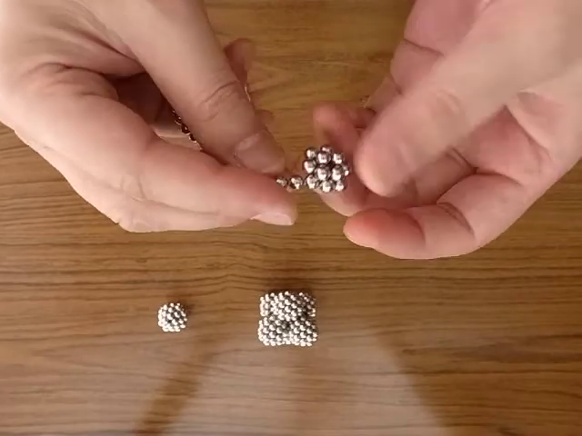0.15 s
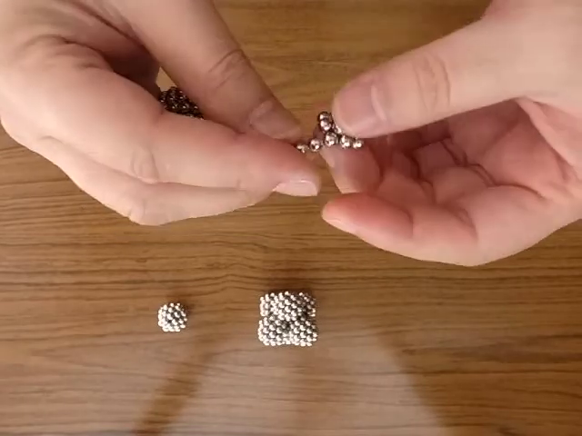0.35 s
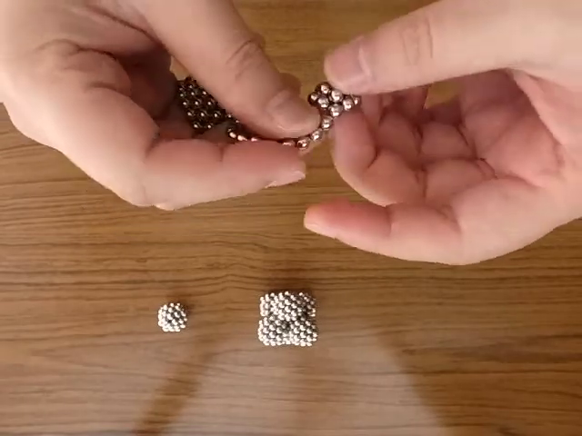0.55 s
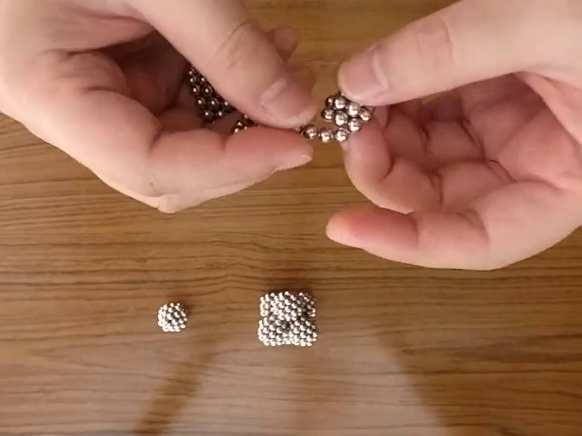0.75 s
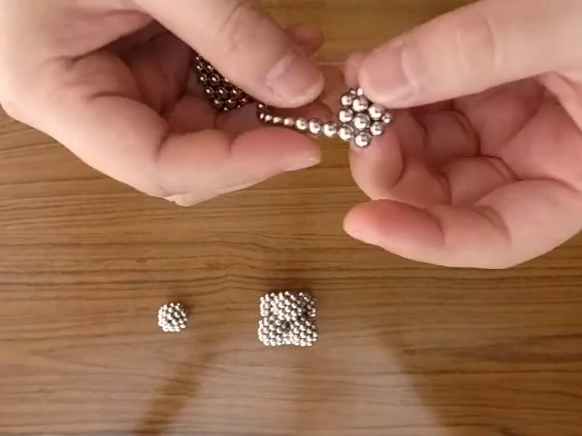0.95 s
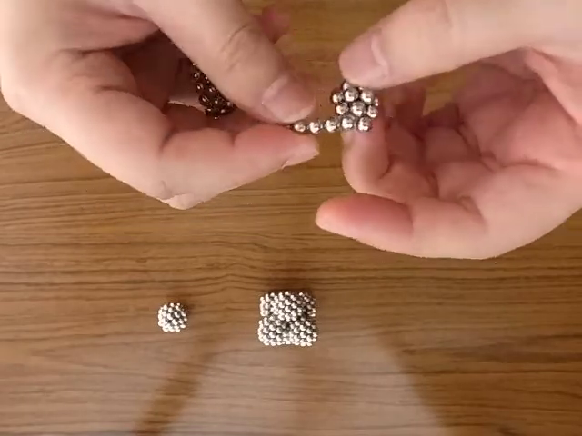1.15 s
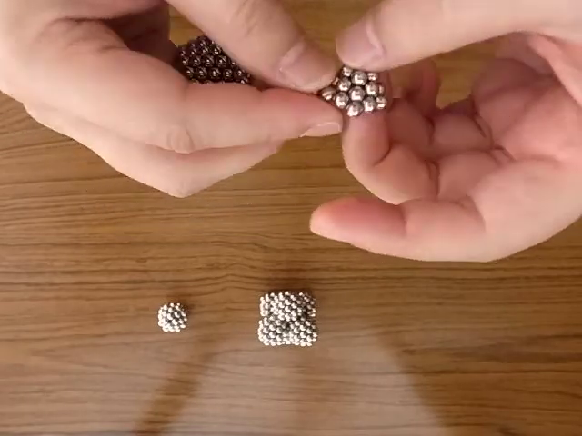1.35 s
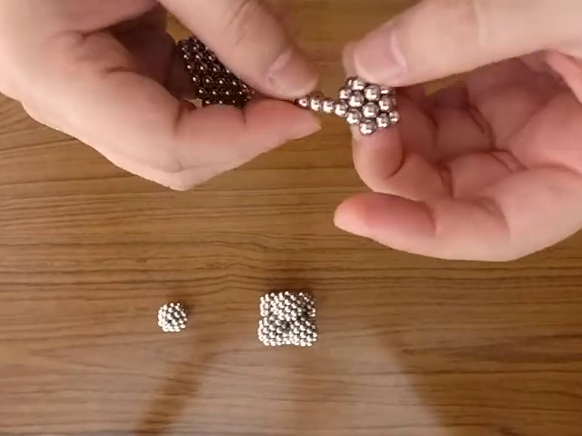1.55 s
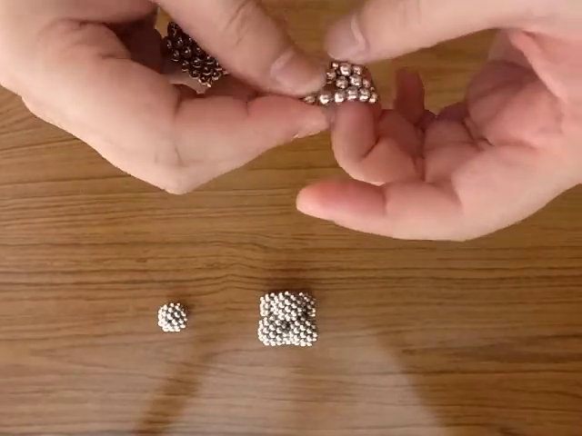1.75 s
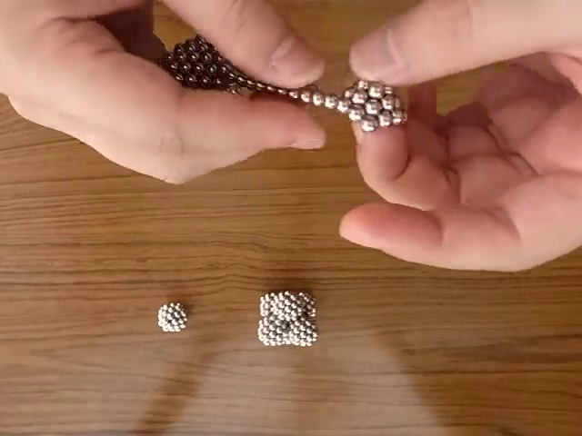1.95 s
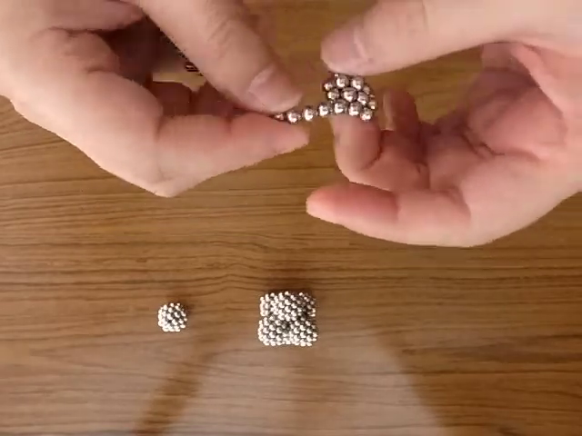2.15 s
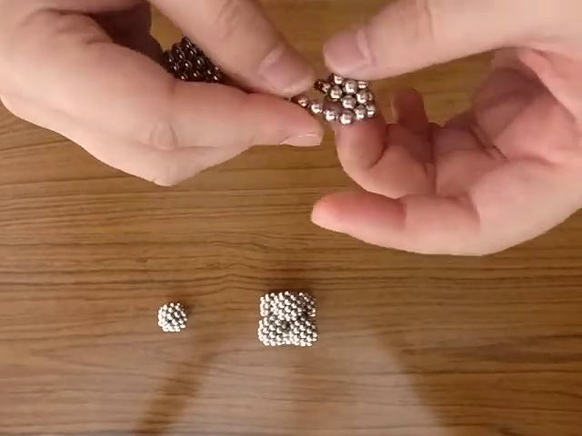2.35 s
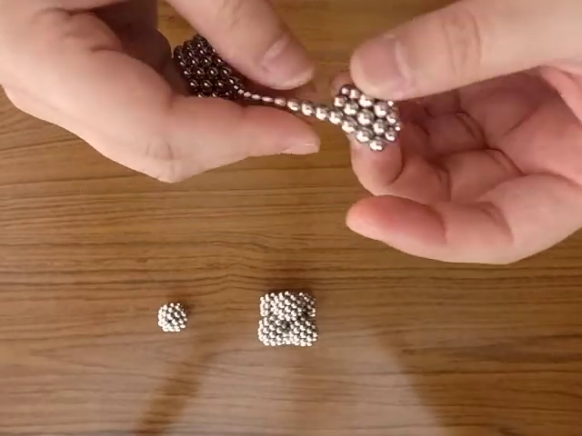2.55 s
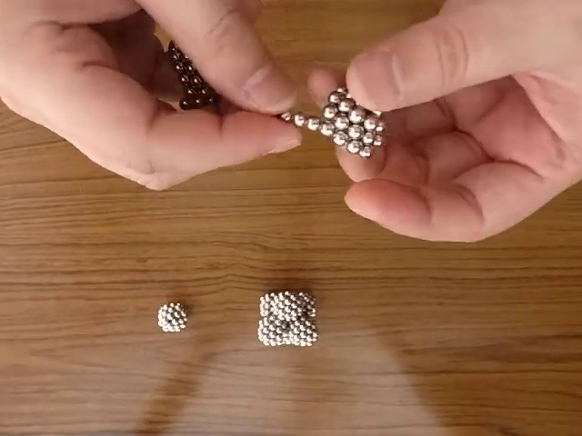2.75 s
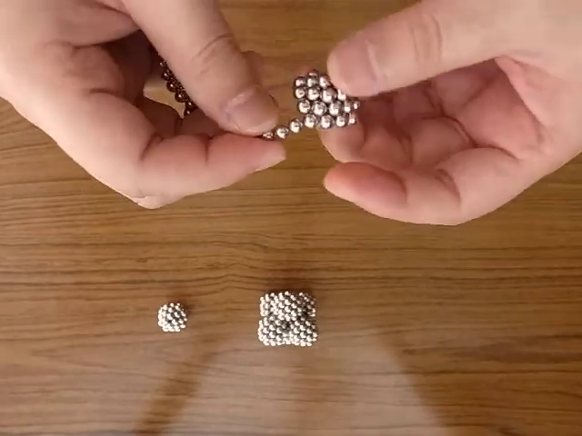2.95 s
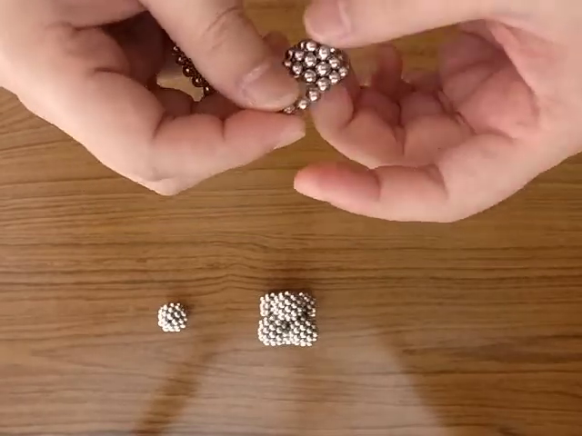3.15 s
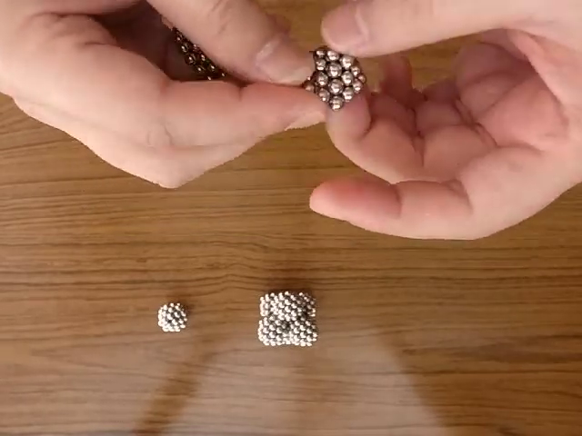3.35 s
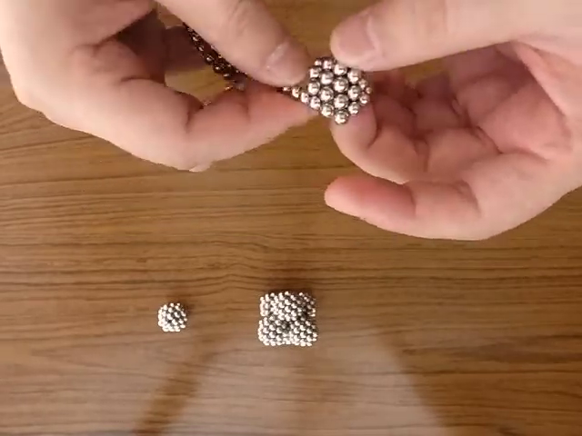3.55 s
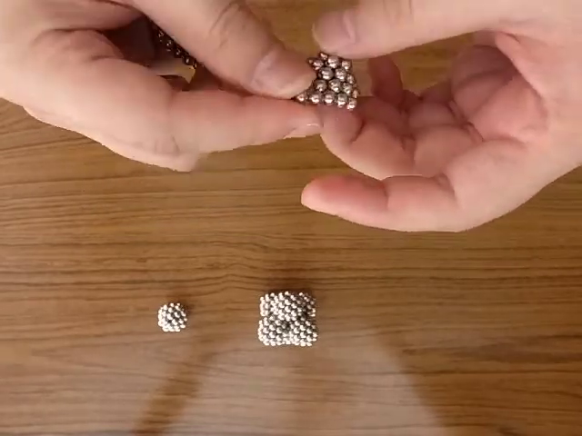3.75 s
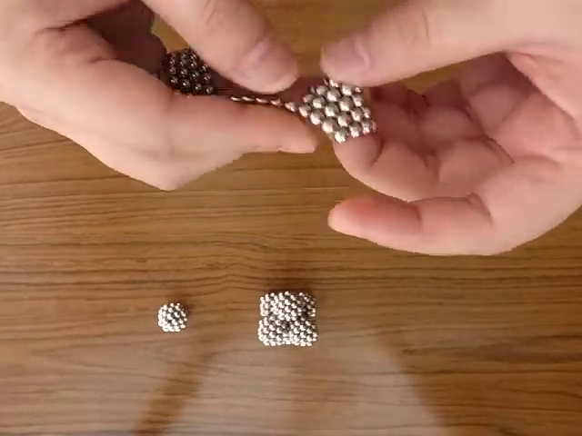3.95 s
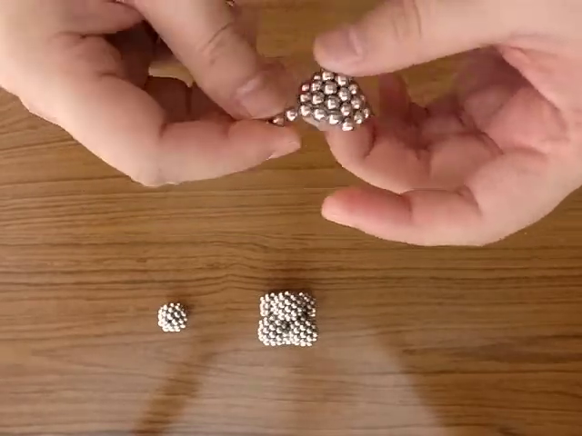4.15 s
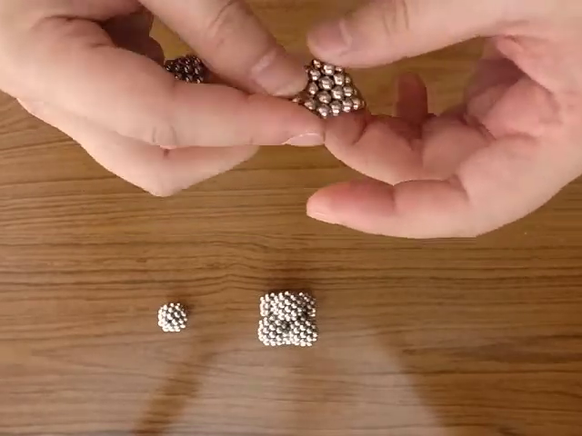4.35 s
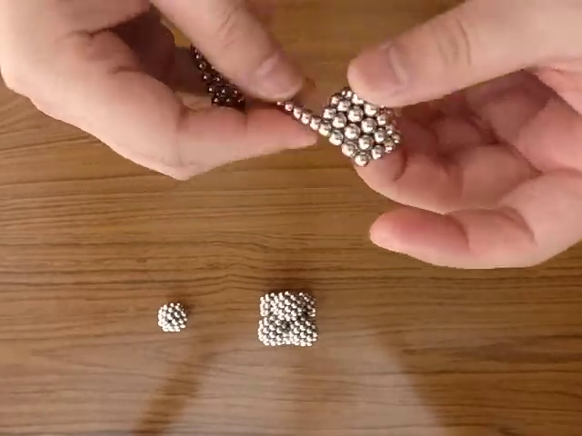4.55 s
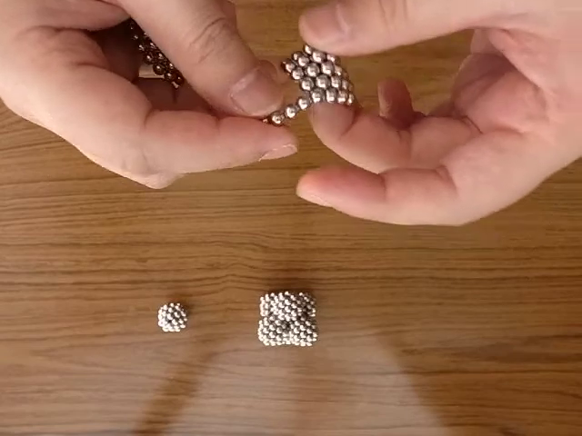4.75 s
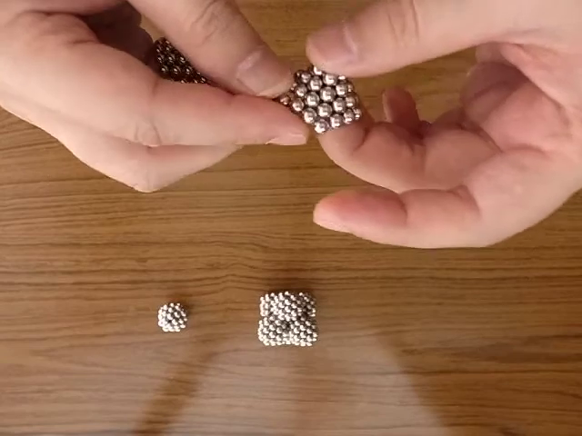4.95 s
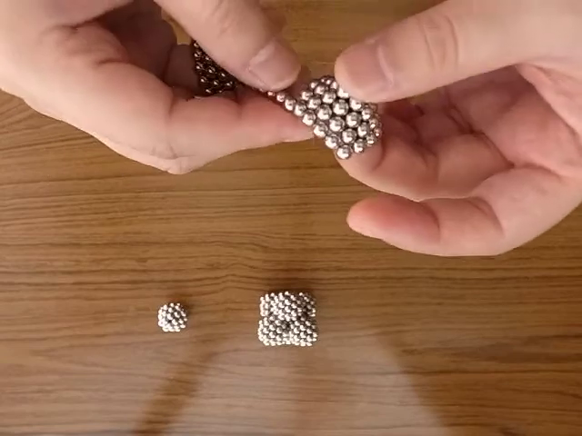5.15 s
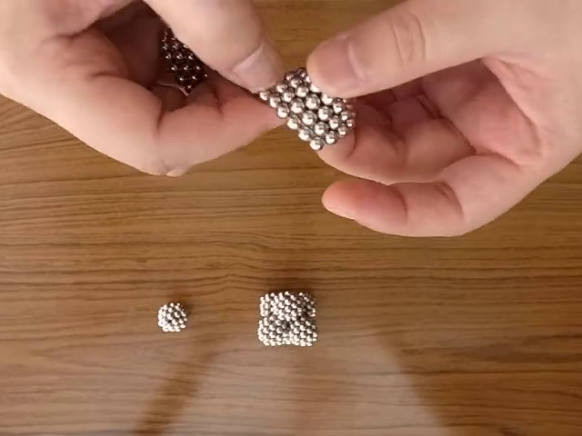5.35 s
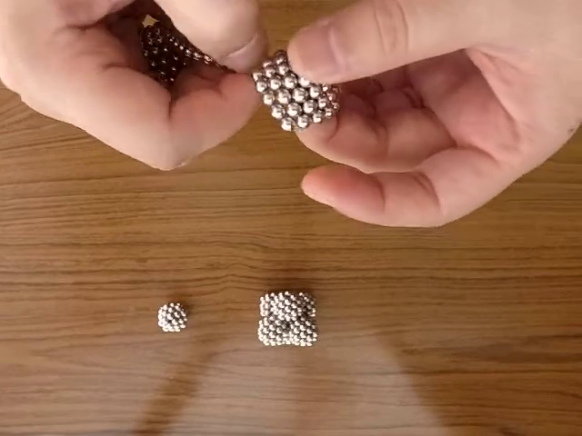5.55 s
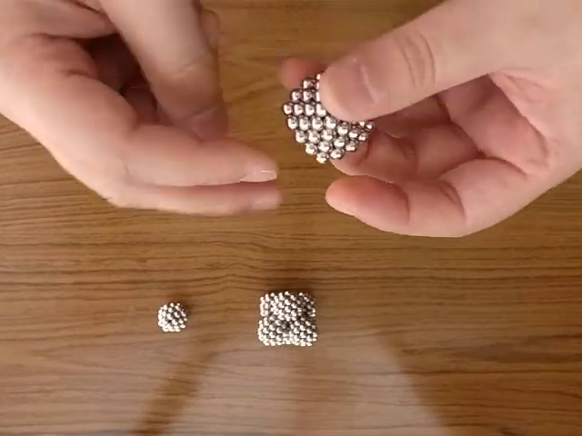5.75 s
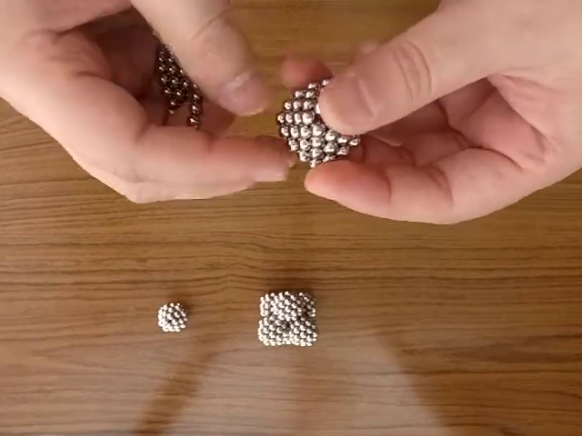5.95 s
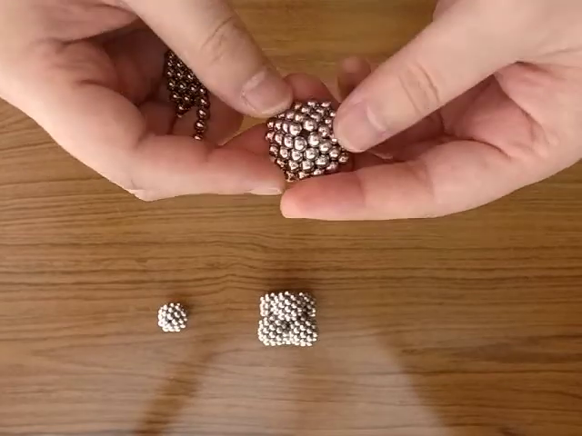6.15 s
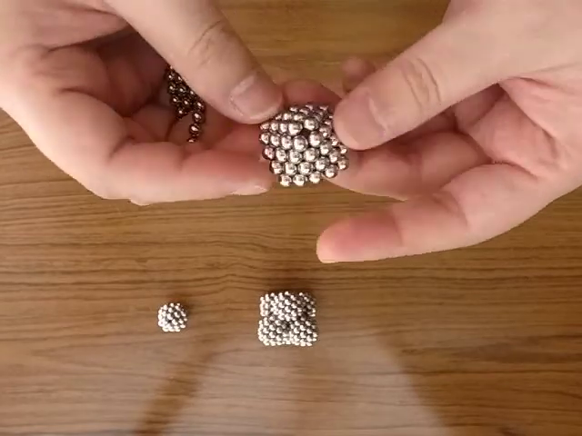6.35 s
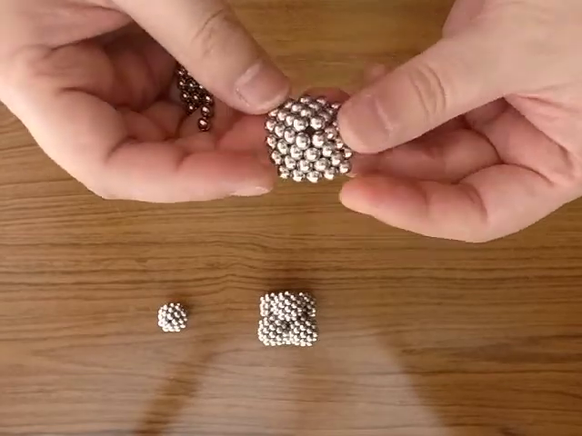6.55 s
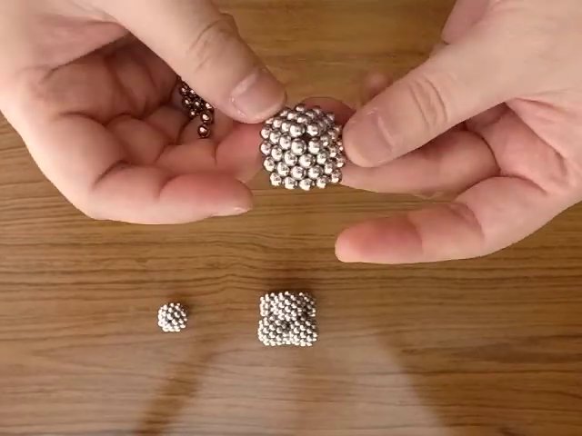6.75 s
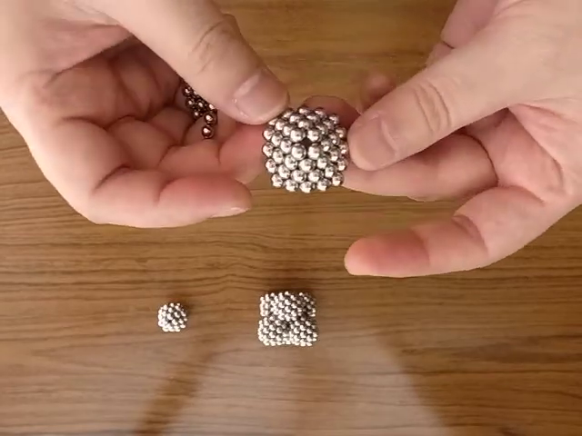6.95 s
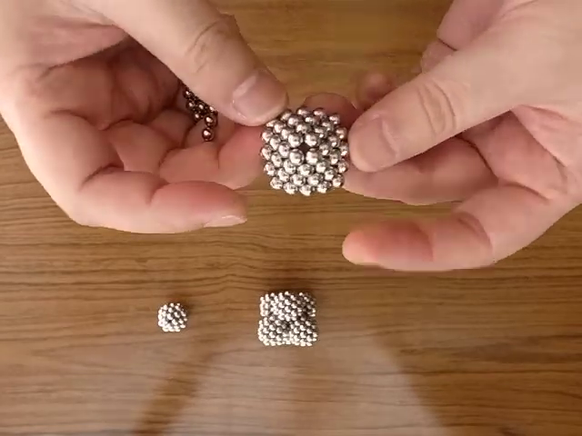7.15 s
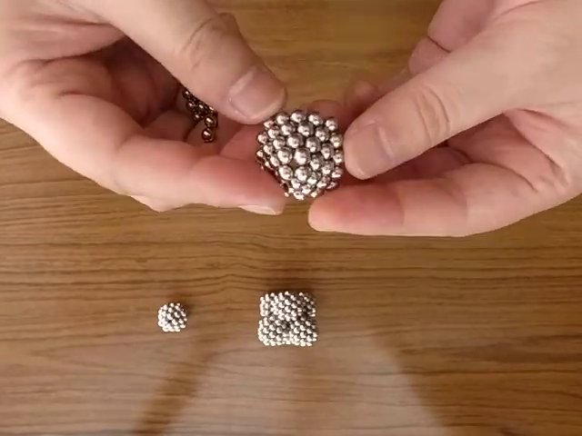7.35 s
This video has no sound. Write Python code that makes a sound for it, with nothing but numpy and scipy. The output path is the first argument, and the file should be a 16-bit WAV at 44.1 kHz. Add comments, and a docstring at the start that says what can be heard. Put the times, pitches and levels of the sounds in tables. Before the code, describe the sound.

A quiet room with faint low rumble, soft hum and thin hiss, heard from a close microphone. From 0 to 0.4 s tiny chain links tick faintly. A hard, bright steel snap cracks at 0.8 s, then others at 1.4, 1.9 and 2.4 s, the last a quick double; some have tiny millisecond bounces. Light feeding ticks fill the gaps. After a pause come a tight double snap at 3.3 s, a very hard one with a dry knock at 3.9 s, and a close pair at 4.4 s. At 4.85 s a fuller, grainy clack rattles and rings briefly, followed by snaps at 4.95 and 5.05 s. The high ring gradually lowers as the cluster grows. Short room reflections follow the clicks, and the loudest sound slightly crushed. Three small ticks at 5.7 to 5.9 s end the action; only quiet hiss and rumble remain until 7.5 s.

```python
"""At a wooden table in a quiet room, hands wind a chain of small magnet balls onto a cluster.
Each ball snaps home as an impact exciting steel and cluster resonances, some with a bounce or two.
The chain ticks as it is fed along; one fuller clack rings on over faint rumble, hums and hiss.
Table and walls reflect the contacts; the hardest overload the microphone and a limiter ducks the level."""
import sys
import numpy as np
from scipy import signal
from scipy.fft import rfft, irfft, next_fast_len
from scipy.io import wavfile
from scipy.ndimage import uniform_filter1d

SR = 44100
rng = np.random.default_rng(int(sys.argv[2]) if len(sys.argv) > 2 else 0)


def to_wav(s):
    """Save 16-bit WAV."""
    ch = np.atleast_2d(s).T  # columns
    pcm = np.round(np.clip(ch, -1, 1) * 32767)  # PCM
    wavfile.write(sys.argv[1], SR, pcm.astype(np.int16))


N = 330614

# spectrum of steel on steel before the ring: pitch_hz, relative_level_db
CONTACT_SPECTRUM = [(200, -71), (1500, -33), (3400, -10.5), (4700, -6), (6300, 0.5), (8600, 0.5),
                    (10500, 3.5), (12000, 4), (14400, 3), (17000, 2.5)]
# resonances of the hand-held cluster: nominal pitch_hz, relative_level_db, t60_s
CLUSTER_MODES = [(3630, -43, 0.018), (4664, -35, 0.02), (4820, -29.5, 0.013), (5200, -41, 0.0071),
                 (5760, -36.5, 0.013)]
# the fuller clack: start_s, rattle_energy_db
CLACK_EVENT = (4.8415, 2.6)
# knock and ringing modes of the clack: pitch_hz, level_db, t60_s
CLACK_RESONANCES = [(2120, -26, 0.0069), (866, -46.5, 0.19), (1545, -50, .2), (1720, -41, 0.15),
                    (2075, -45, 0.17), (2580, -47, 0.17), (4400, -48, 0.44), (6200, -48, .22),
                    (7176, -51, 0.22), (8100, -44, 0.14)]
# spectrum of the clack's dense rattle: pitch_hz, relative_level_db
CLACK_SPECTRUM = [(300, -27), (800, -5), (1200, -6), (2100, 5), (3400, -0.5), (4500, -0.5), (7000, -0.5),
                  (11500, 3), (16000, -3.5)]
# reverberation of the room: pitch_hz, t60_s
ROOM_DECAY = [(500, 0.37), (5000, 0.35), (10000, 0.26), (16000, 0.21)]
# colour of the reverberation: pitch_hz, relative_level_db
ROOM_SPECTRUM = [(500, 8), (5000, -1), (8500, -5), (10600, -2.5), (12000, -3), (14500, 3.5), (16000, 2.5)]
# room rumble and microphone hiss: pitch_hz, relative_level_db
AIR_SPECTRUM = [(15, -65), (25, -10), (48, -3.5), (93, -8.5), (129, -1.5), (169, -8.5), (215, -4.5),
                (289, -13.5), (614, -14.5), (762, -14), (970, -18.5), (2850, -25.5), (6380, -26.5),
                (8350, -27), (15500, -30)]
AIR_LEVEL_DB = -51
# hums and faint whines: pitch_hz, single_resonance_width_hz, level_db
HUM_LINES = [(121.9, 1.6, -65.5), (136, 2.7, -60), (233, 110, -66), (562.6, 22, -70.5), (14500, 100, -78),
             (14780, 70, -99)]
# level curve of the thin hiss: time_s, level_db
HISS_CURVE = [(0, -70.5), (2.3, -68), (2.7, -73), (5, -71), (5.4, -70), (7.5, -68.5)]
# balls snapping home: start_s, energy_db, ring_strength_db, cluster_ring_db, bounces (count), bounce_gap_s
SNAP_EVENTS = [(0.8114, 14.5, 14.5, 0, 0, 0), (1.38, 11.5, 16, 0, 2, 0.0096),
               (1.8785, 12, 18.5, 4.5, 1, 0.0101), (2.424, 10.5, 19, -12, 1, 0.0027),
               (2.4425, 7, 17, -1.5, 1, 0.0017), (3.327, 9, 14, 0, 0, 0), (3.3365, 1.5, 4, -6, 1, 0.0037),
               (3.9118, 16.5, 20, -8, 1, 0.0121), (4.4018, 14.5, 17, -17, 1, 0.01),
               (4.4327, 12, 29, -14, 0, 0), (4.8415, 3.5, 11, -9, 0, 0), (4.959, 12.5, 20, -14, 0, 0),
               (5.022, -2.5, 9.5, 6.5, 0, 0), (5.0447, 6.5, 16.5, 7.5, 0, 0)]
# the ring falls in pitch as the cluster grows
RING_START_HZ, RING_SAG_HZ_PER_S = 14780, 864
# loss from each contact to the next bounce
BOUNCE_LOSS_DB, BOUNCE_CLUSTER_LOSS_DB = 5, 4
# chain ticking against the cluster: start_s, energy_db, ring_pitch_hz, cluster_ring_db
TICK_EVENTS = [(0.367, -10, 10500, 5.5), (1.1621, -21, 12170, 7.5), (1.353, -21, 10120, 1),
               (1.8343, -12.5, 9000, 6.5), (2.2004, -16.5, 5900, 0), (2.3192, -17, 11930, 8),
               (3.3066, -19.5, 10790, 3), (3.6657, -19, 11020, 6), (3.702, -22.5, 12460, 7),
               (3.8517, -4, 12500, 0.5), (4.1848, -18, 8040, -2), (4.2067, -18, 11610, 6),
               (4.3303, -19, 11430, 12), (4.3363, -7.5, 9900, 0), (4.688, -20.5, 11090, 6),
               (5.7273, -8, 8800, -11), (5.7692, -16, 6900, 1), (5.873, -14.5, 11130, 9)]
TICK_RING_DB = 6
# spans in which the fingers feed the chain: start_s, end_s
FEED_SPANS = [(0.05, 0.25), (1.0, 1.21), (1.7, 1.9), (3.45, 3.9), (4.1, 4.33)]
# faint contacts of the links during those spans
LINKS_PER_S, LINK_DB, LINK_SCATTER_DB, LINK_HZ, LINK_CLUSTER_DB = 11, -24.5, 1.5, 11400, 9
EDGE_HZ = 15900  # upper limit of the treble


def amp(db):
    """Decibel law: 20 dB is a tenfold amplitude."""
    return 10 ** (np.asarray(db) / 20)


def unit(x):
    """Energy normalisation: the sum of squares becomes one."""
    return x / np.sqrt(np.sum(x ** 2) + 1e-20)


def read(points, hz):
    """Logarithmic interpolation: equal pitch ratios span equal distances."""
    pitch_hz, value = np.transpose(points)
    return np.interp(np.log(hz + 1), np.log(pitch_hz + 1), value)


def add(mix, start_s, sound):
    """Linear superposition: sounds sum where they overlap in time."""
    part = mix[round(start_s * SR):][:len(sound)]
    part += sound[:len(part)]


def bell(hz, centre_hz, width_hz):
    """Simple resonance: the magnitude falls away on both sides of its centre."""
    return 1 / np.sqrt(1 + (2 * (hz - centre_hz) / width_hz) ** 2)


def causal(gain):
    """Minimum phase: the most compact causal impulse response with a given magnitude."""
    both_sides = np.r_[gain, gain[-2:0:-1]]
    log_gain = np.log(np.maximum(both_sides, 1e-5))
    spectrum = np.exp(np.conj(signal.hilbert(log_gain)))
    return irfft(spectrum[:len(gain)])


def high_pass(x, low_hz):
    """Second-order high-pass filtering: slow variations are attenuated."""
    return signal.sosfilt(signal.butter(2, low_hz, "high", fs=SR, output="sos"), x)


def background():
    """Stationary noise: broadband rumble and hiss with narrow spectral lines added in power."""
    hz = np.fft.rfftfreq(N, 1 / SR)
    power = (amp(AIR_LEVEL_DB) * unit(amp(read(AIR_SPECTRUM, hz)))) ** 2
    for pitch_hz, width_hz, level_db in HUM_LINES:
        line = unit(bell(hz, pitch_hz, width_hz) ** 2)
        power = power + (amp(level_db) * line) ** 2
    return irfft(rfft(rng.standard_normal(N)) * np.sqrt(power * N / 2), N)


def hiss(centre_hz=8400, width_hz=1500):
    """Narrow-band noise: filtered randomness under a slow level envelope."""
    # cubing the resonance makes the band narrower than width_hz
    band_gain = bell(np.fft.rfftfreq(N, 1 / SR), centre_hz, width_hz) ** 3
    band = irfft(rfft(rng.standard_normal(N)) * band_gain, N)
    level_db = np.interp(np.arange(N) / SR, *np.transpose(HISS_CURVE))
    return amp(level_db) * band / band.std()


def links(count=12):
    """Random light impacts: links shift at uneven intervals as the chain slides through the fingers."""
    for start_s, end_s in FEED_SPANS:
        times_s = start_s + (np.arange(count) + rng.random(count)) / LINKS_PER_S
        levels_db = LINK_DB + LINK_SCATTER_DB * rng.standard_normal(count)
        for time_s, energy_db in zip(times_s[times_s < end_s], levels_db):
            yield time_s, energy_db, LINK_HZ, TICK_RING_DB, LINK_CLUSTER_DB


def click(energy_db, ring_hz, ring_db, cluster_db, width_hz=1600, spread_hz=2100,
          chatter=0.59, chatter_s=0.00052, settle=0.12, settle_s=0.0031, size=1024):
    """Impact excitation: a shock chatters through the balls and drives their resonances."""
    t, hz = np.arange(size) / SR, np.fft.rfftfreq(size, 1 / SR)
    decay = chatter * np.exp(-t / chatter_s) + settle * np.exp(-t / settle_s)
    shock = rng.standard_normal(size) * decay
    shock[0] = 2  # the first blow
    steel = amp(read(CONTACT_SPECTRUM, hz))
    steel = steel / np.linalg.norm(causal(steel))
    # the grip detunes the cluster a little from one click to the next
    grip = rng.uniform(.975, 1.025)
    cluster = np.zeros(size)
    for pitch_hz, level_db, t60_s in CLUSTER_MODES:
        envelope = amp(level_db + cluster_db - 60 * t / t60_s)
        cluster = cluster + envelope * np.sin(2 * np.pi * pitch_hz * grip * t)

    def response(ring_width_hz):
        """Modal superposition: the steel's ring and the cluster's modes add."""
        ring = 1 + (amp(ring_db) - 1) * bell(hz, ring_hz, ring_width_hz) ** 1.12
        return causal(steel * ring) + cluster

    # summed over all directions, the ring is broader and the chatter evens out
    head_on = unit(signal.fftconvolve(shock, response(width_hz)))
    all_round = unit(response(spread_hz))
    return amp(energy_db) * head_on, amp(energy_db) * all_round


def room(direct, spread, table_s=0.001226, table_db=-11, near_s=0.0044, near_db=-26,
         wet_db=-14, early_db=-19, early_s=0.013, gap_s=0.0041):
    """Reflection and reverberation: the table answers first, then nearby things, then the walls."""
    t = np.arange(SR // 2) / SR
    hz, frame_s, frames = signal.stft(rng.standard_normal(len(t)), SR, nperseg=256)
    # each pitch decays at its own rate
    colour_db = read(ROOM_SPECTRUM, hz)[:, None]
    decay_db = 60 * frame_s / read(ROOM_DECAY, hz)[:, None]
    tail = signal.istft(frames * amp(colour_db - decay_db), SR, nperseg=256)[1][:len(t)]
    arrive = np.clip(t / gap_s, 0, 1) ** 2
    early = rng.standard_normal(len(t)) * np.exp(-t / early_s)
    echo = amp(wet_db) * unit(tail * arrive) + amp(early_db) * unit(early * arrive)
    mix = direct + signal.fftconvolve(spread, echo)[:N]
    add(mix, table_s, amp(table_db) * direct)
    add(mix, near_s, amp(near_db) * direct)
    return mix


def radiate(x):
    """Radiation efficiency: bodies this small send out little bass."""
    return high_pass(x, 1100)


def ticks():
    """Weak impact: light single contacts hardly excite the ring."""
    for start_s, energy_db, ring_hz, cluster_db in TICK_EVENTS:
        yield start_s, energy_db, ring_hz, TICK_RING_DB, cluster_db


def snaps():
    """Inelastic rebound: each bounce is weaker; the ring falls as the cluster grows."""
    for start_s, energy_db, ring_db, cluster_db, bounces, gap_s in SNAP_EVENTS:
        ring_hz = RING_START_HZ - RING_SAG_HZ_PER_S * start_s
        for k in range(round(bounces) + 1):
            contact_db = energy_db - k * BOUNCE_LOSS_DB
            stirred_db = cluster_db - k * BOUNCE_CLUSTER_LOSS_DB
            yield start_s + k * gap_s, contact_db, ring_hz, ring_db, stirred_db


def tock(energy_db, hard_db=16, steepness=7.7, tock_db=-9, tock_hz=2400, t60_s=0.00088, size=256):
    """Nonlinear excitation: hard impacts jolt the whole cluster with a dry, lower knock."""
    t = np.arange(size) / SR
    # below hard_db the knock loses 7.7 dB for each dB of impact
    level_db = tock_db + steepness * min(energy_db - hard_db, 0)
    return amp(level_db - 60 * t / t60_s) * np.cos(2 * np.pi * tock_hz * t)


def clack(energy_db, fast_s=0.0078, slow_s=0.052, slow_share=0.49, grain_db=3, size=16384):
    """Modal decay with dense impacts: a knock and ringing modes join a grainy, two-stage rattle."""
    t, hz = np.arange(size) / SR, np.fft.rfftfreq(size, 1 / SR)
    grains = uniform_filter1d(rng.standard_normal(size), size=40)
    shocks = rng.standard_normal(size) * amp(grain_db * grains / grains.std())
    shocks = shocks * (np.exp(-t / fast_s) + slow_share * np.exp(-t / slow_s))
    rattle = signal.fftconvolve(shocks, causal(amp(read(CLACK_SPECTRUM, hz))))[:size]
    modes = np.zeros(size)
    for pitch_hz, level_db, t60_s in CLACK_RESONANCES:
        modes = modes + amp(level_db - 60 * t / t60_s) * np.sin(2 * np.pi * pitch_hz * t)
    return amp(energy_db) * unit(rattle) + modes


def scene():
    """Superposition: the background, the clack and every contact in the room add linearly."""
    mix = background() + hiss()
    clack_s, clack_db = CLACK_EVENT
    add(mix, clack_s, clack(clack_db))
    direct, spread = np.zeros((2, N))
    for start_s, energy_db, *ring in [*snaps(), *ticks(), *links()]:
        head_on, all_round = click(energy_db, *ring)
        add(direct, start_s, head_on)
        add(direct, start_s, tock(energy_db))
        add(spread, start_s, all_round)
    return (mix + radiate(room(direct, spread)))[None]


def record(dry, overload=3.0, crack_share=0.9, crack_hz=1800, limit_db=-1, recover_db_per_s=52,
           attack_s=0.00095, ceiling=0.63):
    """Overload and limiting: high peaks distort, and the gain ducks fast and recovers slowly."""
    # the tallest peaks are flattened on one side, which adds a broad crack
    excess = np.maximum(dry[0] - overload, 0)
    heard = dry[0] - crack_share * high_pass(excess, crack_hz)
    envelope = abs(signal.hilbert(heard, next_fast_len(N))[:N])
    over_db = np.maximum(20 * np.log10(envelope + 1e-9) - limit_db, 0)
    # the gain reduction holds each peak and recovers at a steady rate
    fall_db = np.arange(N) / SR * recover_db_per_s
    held_db = np.maximum.accumulate(over_db + fall_db) - fall_db
    lag = np.exp(-1 / (attack_s * SR))
    ducked = heard / amp(signal.lfilter([1 - lag], [1, -lag], held_db))
    # what slips past the limiter is rounded off, at twice the sample rate
    doubled = signal.resample_poly(ducked, 2, 1)
    rounded = signal.resample_poly(ceiling * np.tanh(doubled / ceiling), 1, 2)
    low_pass = signal.firwin(255, EDGE_HZ, window=("kaiser", 8), fs=SR)
    return signal.oaconvolve(rounded, low_pass, "same")[None]


dry = scene()
out = record(dry)
to_wav(out)
```